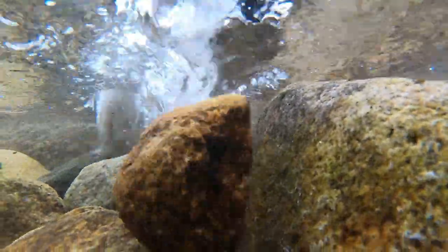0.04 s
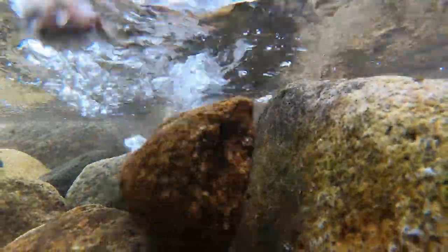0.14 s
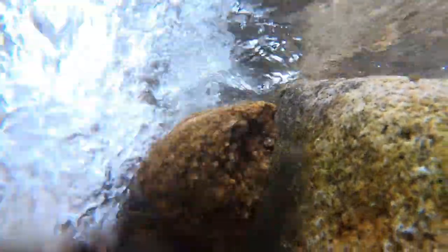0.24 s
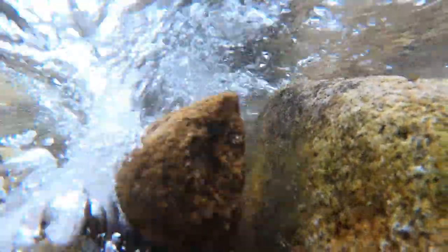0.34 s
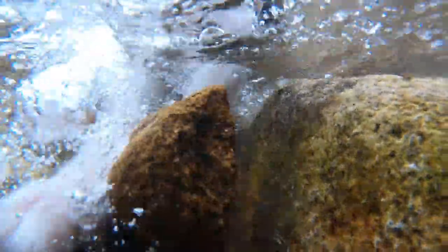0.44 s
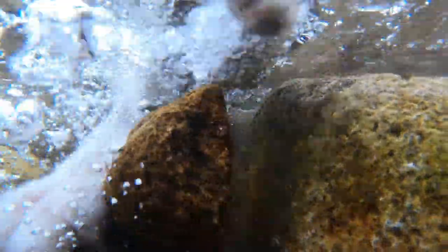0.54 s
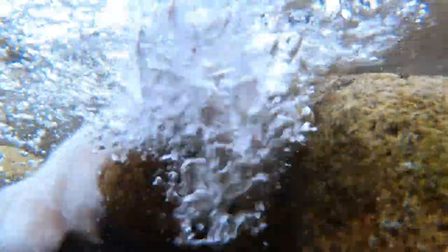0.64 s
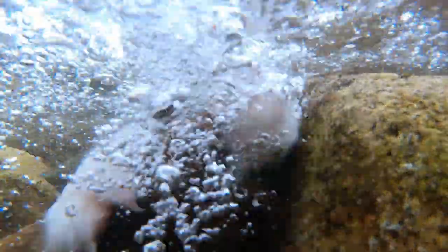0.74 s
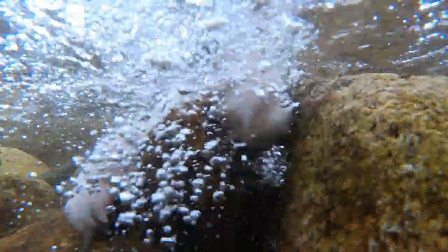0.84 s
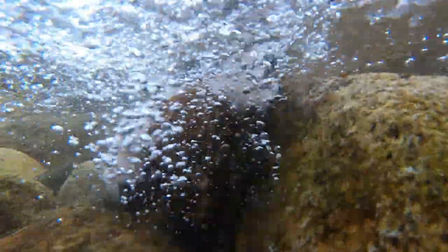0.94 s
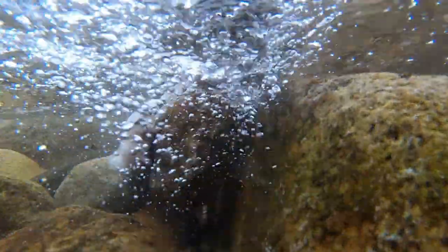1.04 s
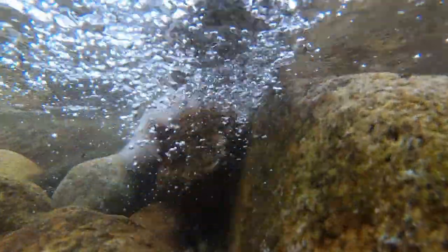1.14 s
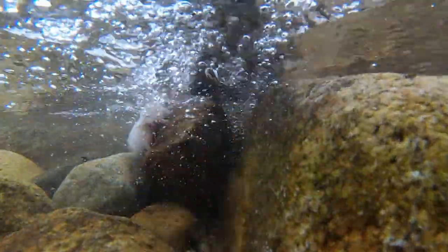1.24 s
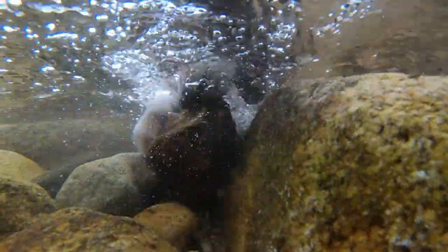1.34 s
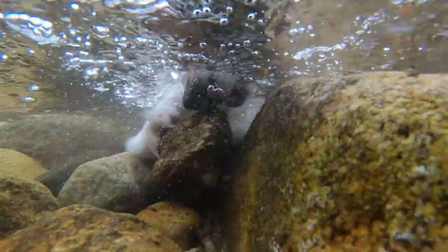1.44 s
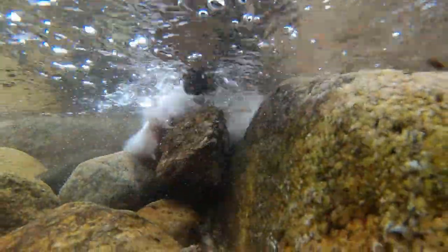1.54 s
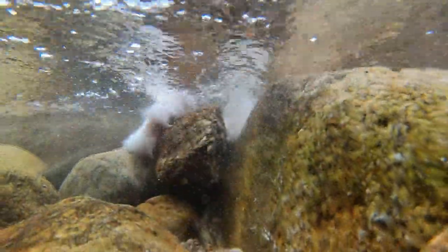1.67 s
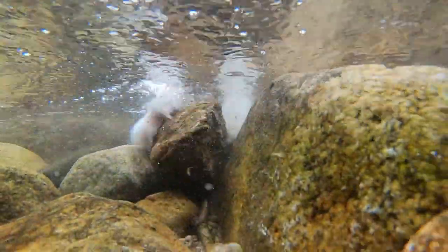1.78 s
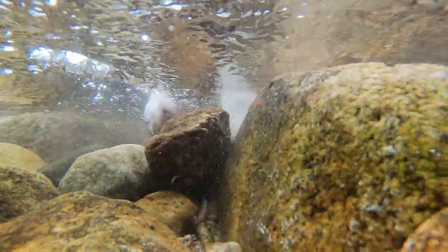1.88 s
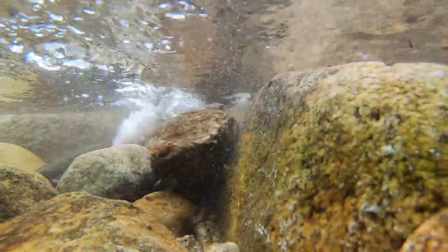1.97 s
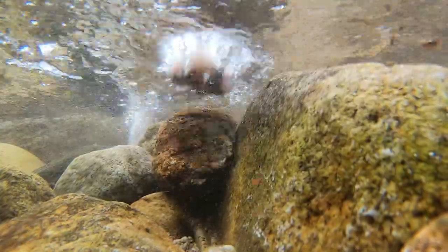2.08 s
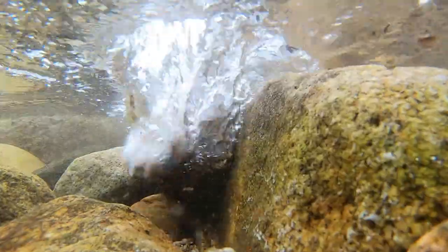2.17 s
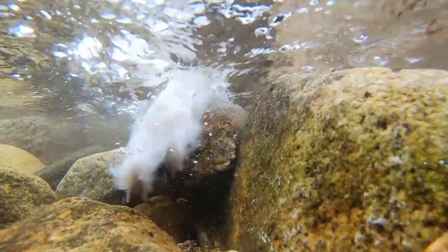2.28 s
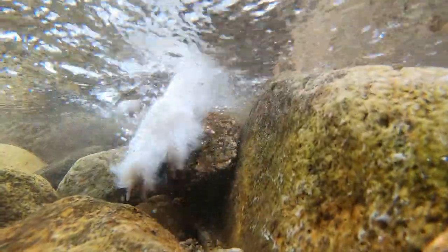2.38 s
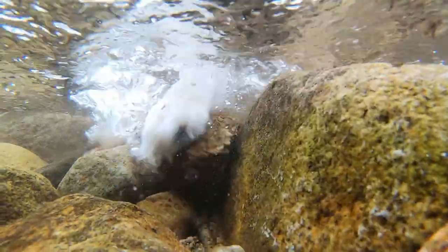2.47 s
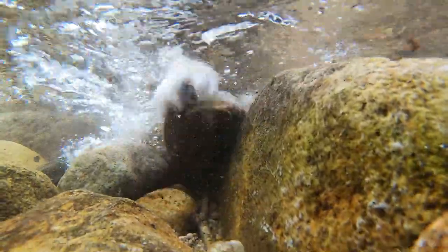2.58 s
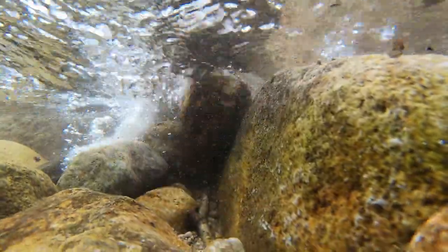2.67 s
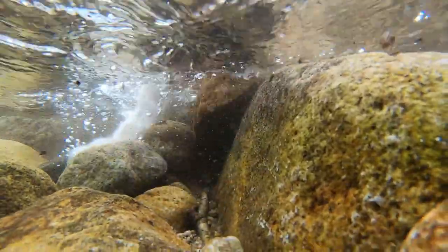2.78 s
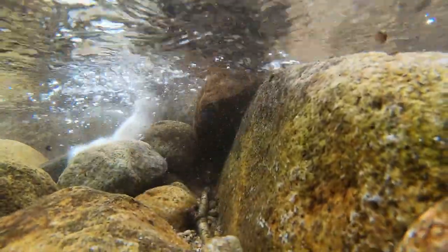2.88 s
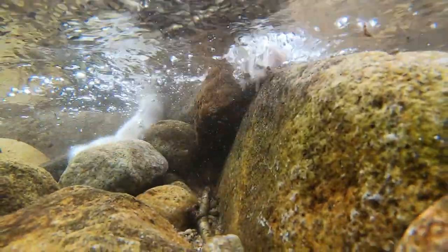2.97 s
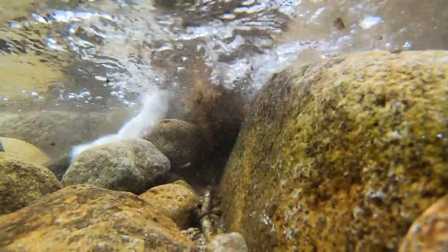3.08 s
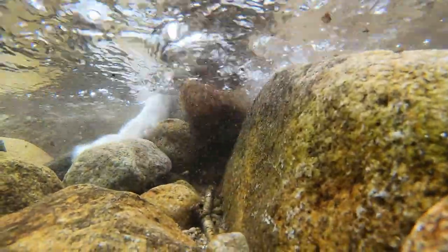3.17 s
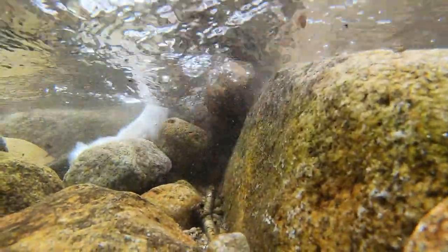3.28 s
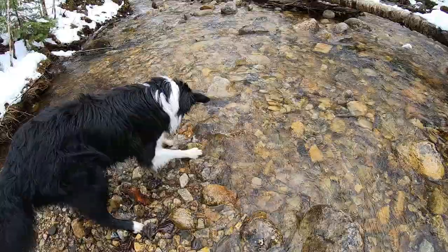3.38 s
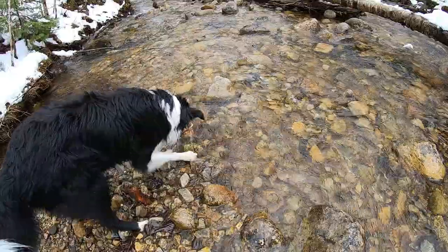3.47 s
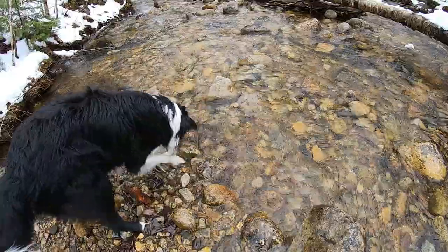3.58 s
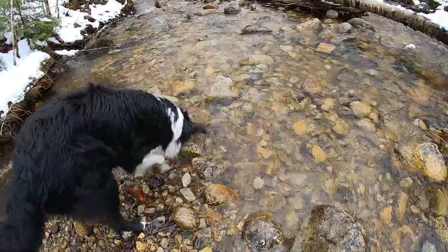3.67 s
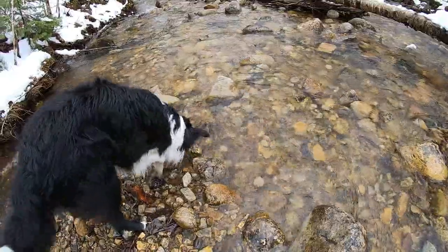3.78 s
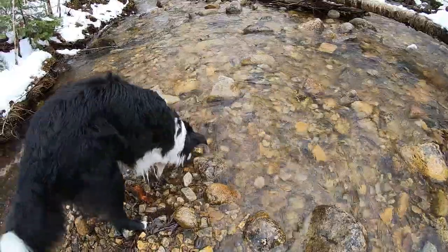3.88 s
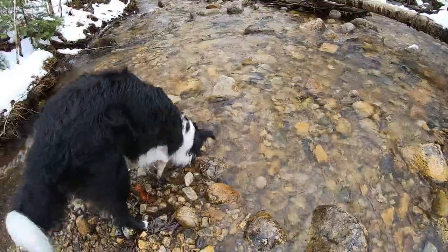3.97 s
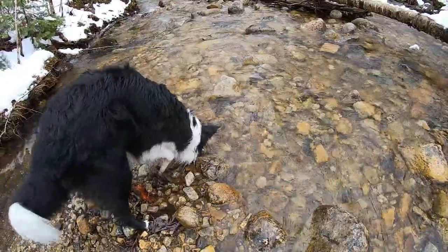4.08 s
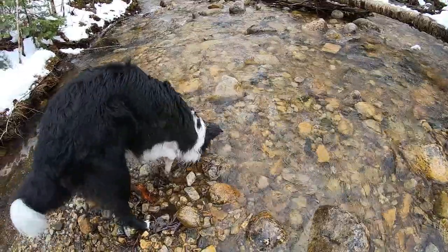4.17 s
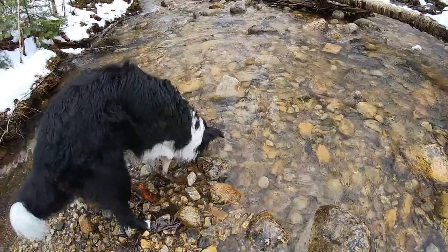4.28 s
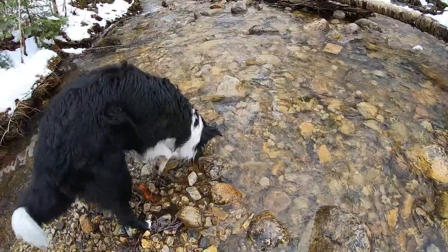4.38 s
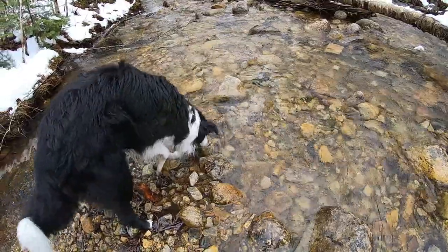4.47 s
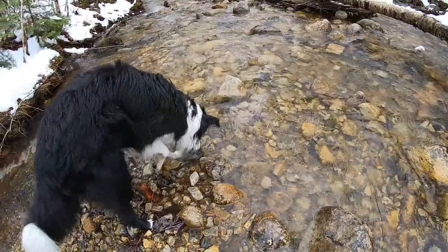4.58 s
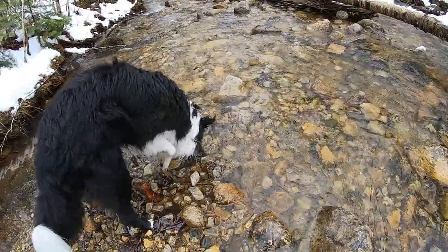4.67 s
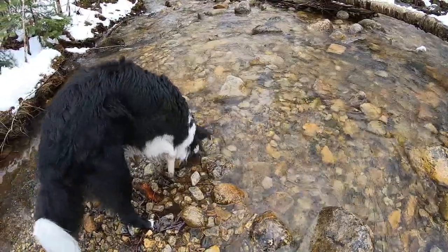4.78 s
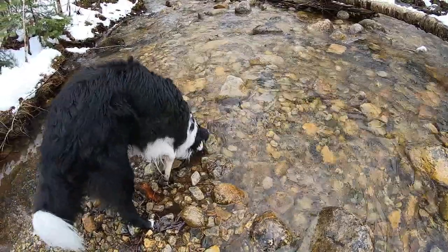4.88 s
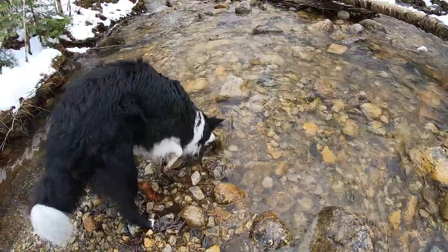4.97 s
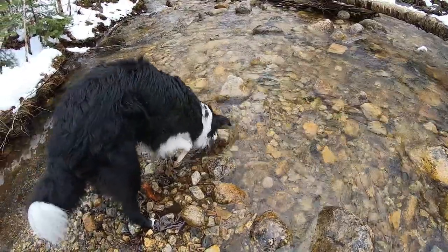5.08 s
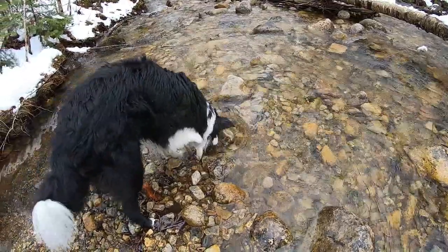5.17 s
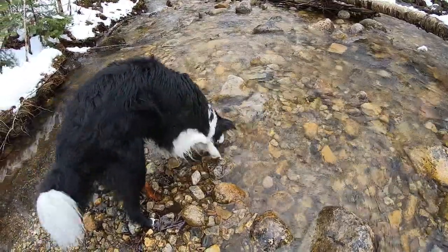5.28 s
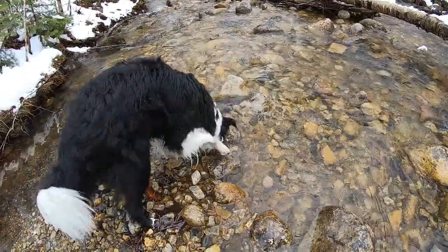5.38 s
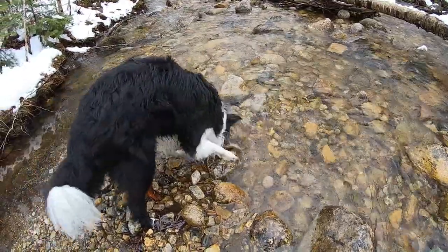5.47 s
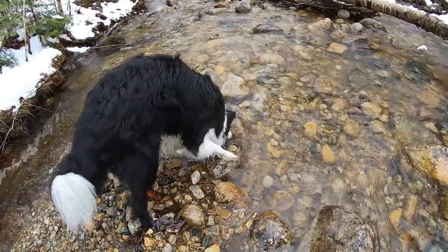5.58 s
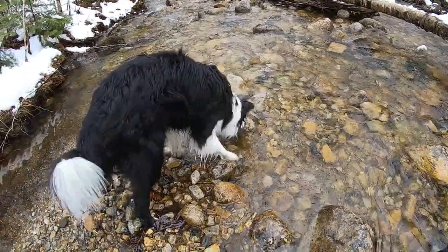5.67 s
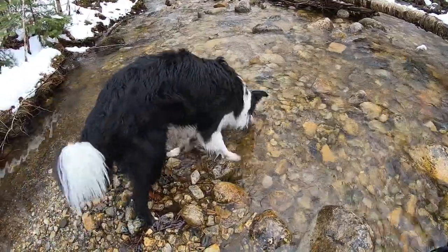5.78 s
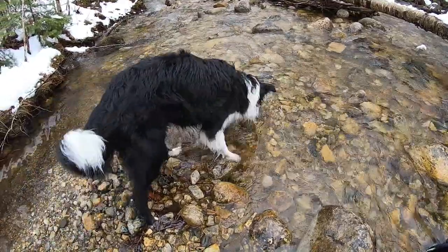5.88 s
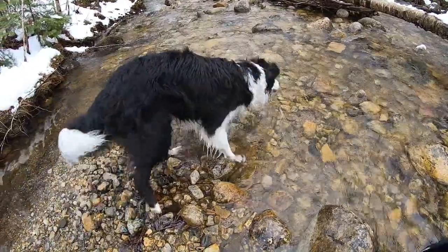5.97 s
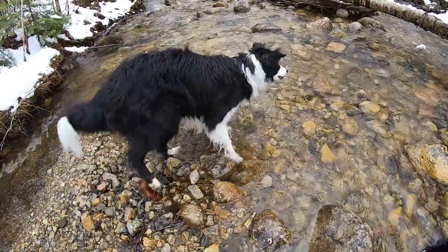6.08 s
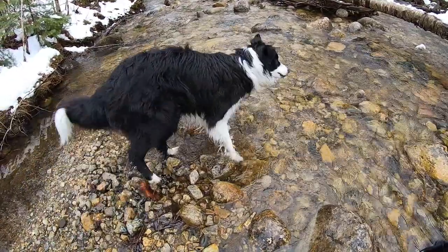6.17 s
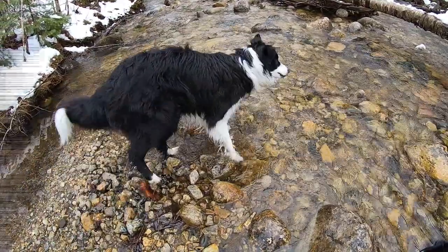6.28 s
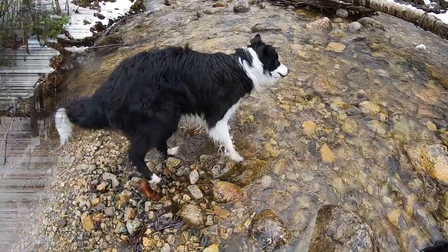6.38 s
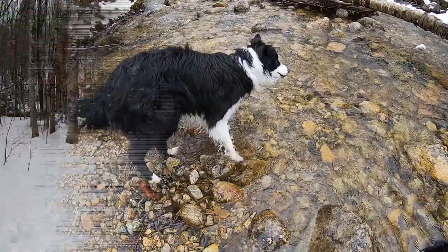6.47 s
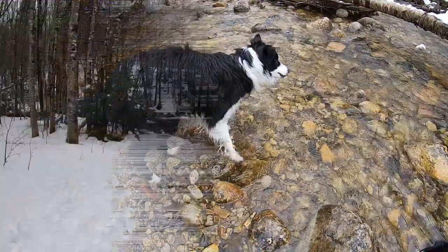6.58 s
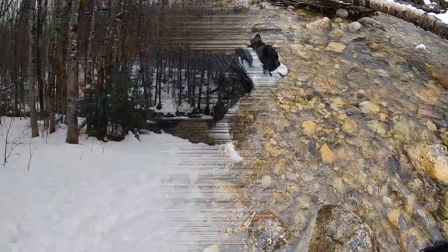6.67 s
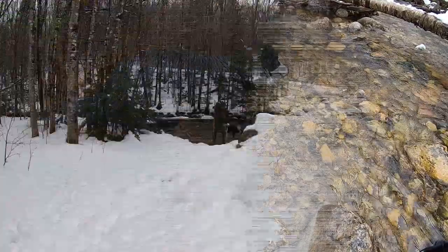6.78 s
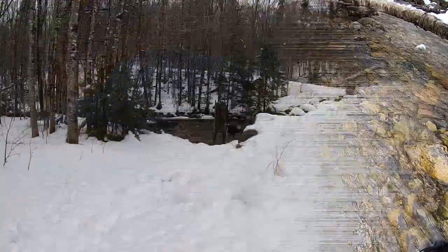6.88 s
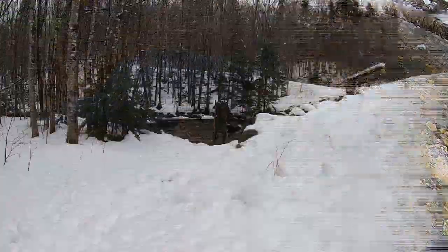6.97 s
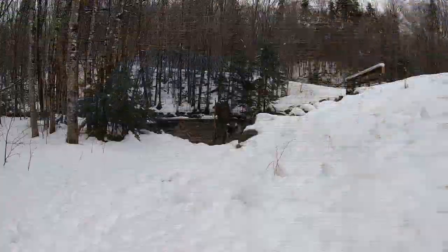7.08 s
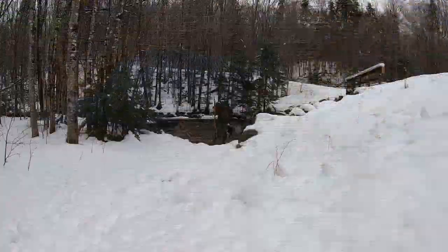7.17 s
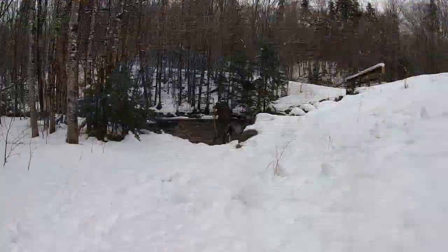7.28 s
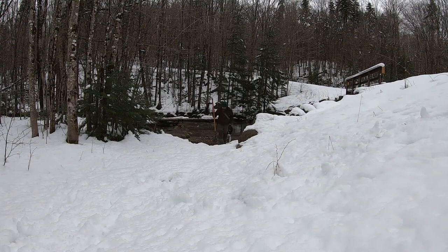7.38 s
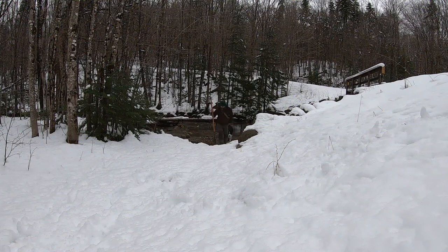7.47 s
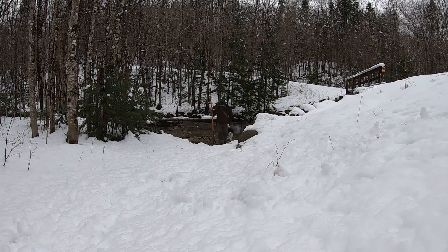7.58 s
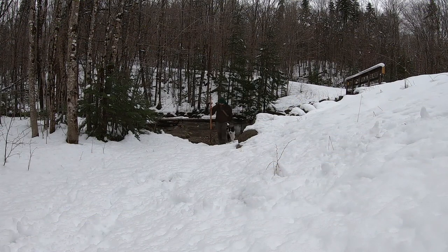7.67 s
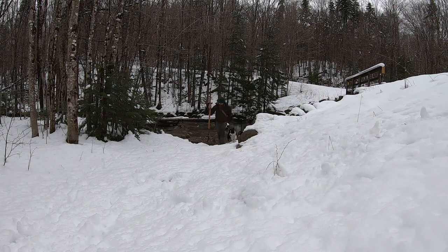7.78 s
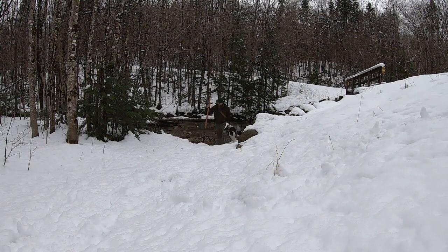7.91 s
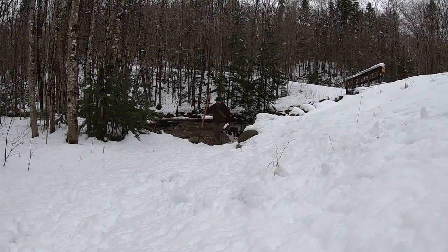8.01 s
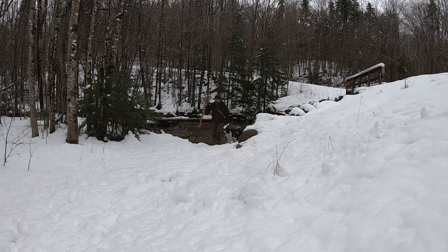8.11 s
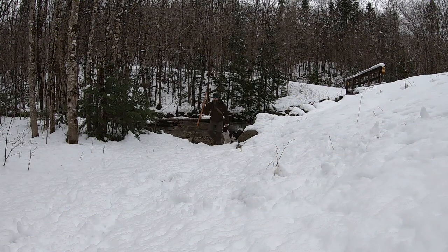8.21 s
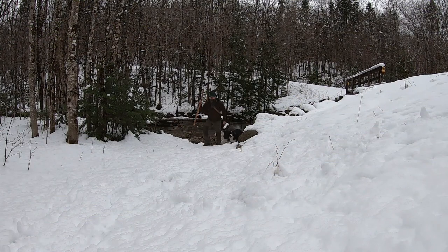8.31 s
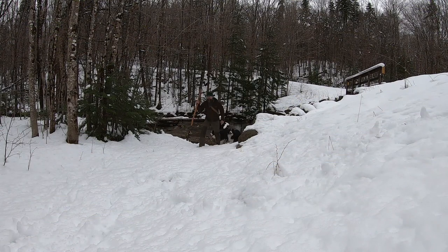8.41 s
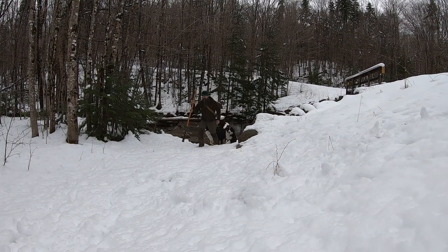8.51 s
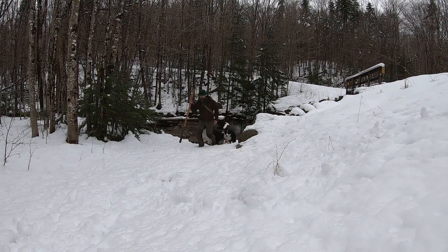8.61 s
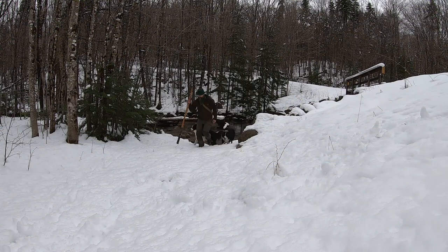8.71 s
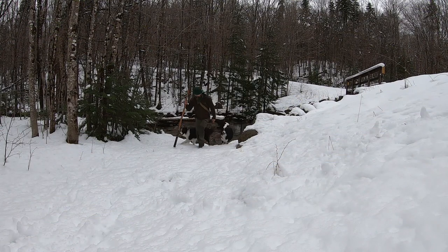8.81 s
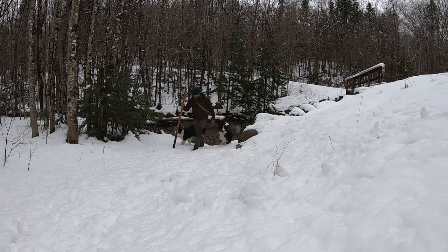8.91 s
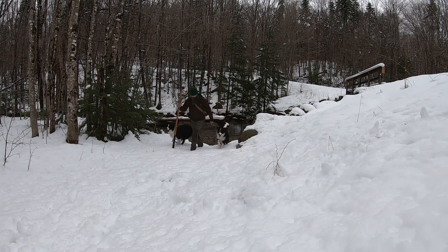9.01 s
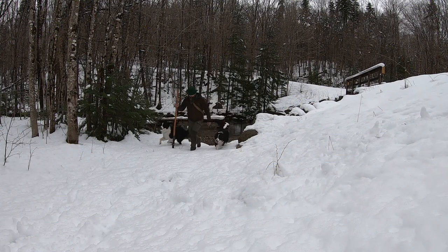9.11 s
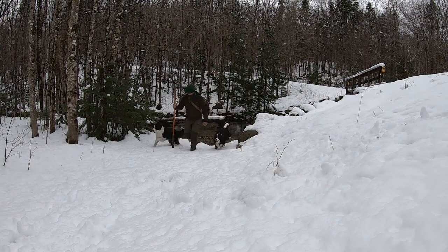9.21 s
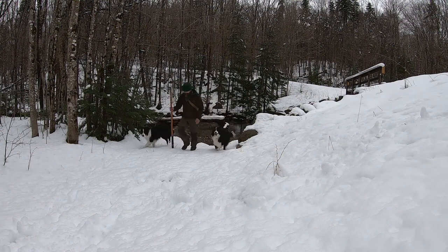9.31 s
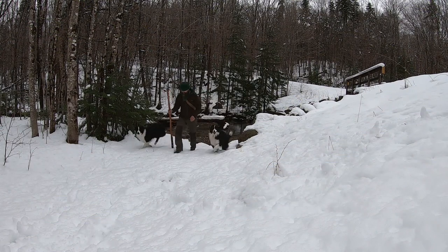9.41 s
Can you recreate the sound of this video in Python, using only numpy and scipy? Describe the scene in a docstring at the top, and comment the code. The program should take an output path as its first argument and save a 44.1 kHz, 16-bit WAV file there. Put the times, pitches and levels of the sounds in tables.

```python
"""A shallow rocky stream heard from three places in turn, parted by about 10 ms of silence.
Under water a dog paws at a stone: damped tones make thuds and bubbles, resonated clicks make bubble clouds and
grit, all nearly mono and mostly muffled. Just above the water, coloured noise and small resonators make
the babble, and paws splash and drip as short swells of noise and tone. Last, from afar across snow, partly coherent
noise makes a smooth, wide rush, with two short bright puffs."""
import sys
import numpy as np
from scipy import signal
from scipy.fft import rfft, irfft, next_fast_len
from scipy.io import wavfile
from scipy.ndimage import uniform_filter1d

SR = 44100
rng = np.random.default_rng(int(sys.argv[2]) if len(sys.argv) > 2 else 0)


def inscribe(sig):
    """Save sig as 16-bit PCM at rate SR to the path in sys.argv[1].

    A 1-D sig is mono; a 2-D sig holds one channel per row.
    Samples are clipped to [-1, 1] before scaling.
    """
    pcm = np.round(np.clip(np.atleast_2d(sig).T, -1, 1) * 32767)
    wavfile.write(sys.argv[1], SR, pcm.astype(np.int16))


N = 416744
TIME = np.arange(N) / SR
SIZE = next_fast_len(N)
HZ = np.maximum(np.fft.rfftfreq(SIZE, 1 / SR), 1)

# Strokes of the paws under water. Each row: start in seconds, length in seconds,
# churn level in dB, bubble cloud level in dB, both before the muffling.
STROKES = [(0.0, 0.18, -14, -25.5), (0.246, 0.27, -22, -25), (0.64, 0.091, -25, -24.5),
           (0.707, 0.2, -18, -25), (0.93, 0.098, -28.5, -23), (1.018, 0.19, -20, -32),
           (1.29, 0.093, -18, -31), (1.413, 0.11, -23.5, -37.5), (1.572, 0.054, -28, -46.5),
           (1.815, 0.18, -15.5, -35), (2.115, 0.22, -19, -30.5), (2.512, 0.32, -14.5, -33),
           (2.852, 0.11, -18.5, -30.5), (3, 0.15, -18, -30.5), (3.197, 0.17, -16, -32.5)]
STROKE_ATTACK_S, STROKE_RELEASE_S = 0.0087, 0.0037
# Spectrum of spray. Each row: frequency in Hz, relative level in dB per Hz.
SPRAY_SPECTRUM = [(250, -40), (500.0, -8), (1150.0, -3), (1400.0, -0.5), (1750, -10.5), (2300.0, -14),
                  (2950.0, -2.5), (4000.0, -11), (5100.0, -12), (5600.0, -31), (9500.0, -30.5),
                  (11000.0, -39), (15500.0, -52.5)]
SPLASH_ATTACK_S, SPLASH_RELEASE_S = 0.012, 0.012


def from_db(db):
    """Amplitude ratio: 20 dB is a factor of ten."""
    return 10 ** (np.asarray(db) / 20)


def rms_one(x):
    """Normalisation by mean power: scale to rms 1."""
    return x / np.sqrt(np.mean(x ** 2) + 1e-20)


def columns(rows, at, warp=np.asarray):
    """Linear interpolation of every later column along the first, whose axis may be warped."""
    first, *rest = np.transpose(rows)
    return [np.interp(warp(at), warp(first), column) for column in rest]


def colour(x, spectrum):
    """Linear filtering: a flat signal takes on the given spectrum, at rms 1."""
    gain_db = columns(spectrum, HZ, np.log)[0]
    filtered = irfft(rfft(x, SIZE) * from_db(gain_db), SIZE)
    return rms_one(filtered[:N])


def drift(rate_hz):
    """Low-pass random fluctuation: noise twice through a one-pole filter, at rms 1."""
    pole = np.exp(-2 * np.pi * rate_hz / SR)
    noise = rng.standard_normal(N + SR)
    settled = signal.lfilter([1], [1, -2 * pole, pole * pole], noise)[SR:]
    return rms_one(settled)


def narrow_band(width_hz, phase):
    """Quadrature modulation: two slow drifts on cosine and sine make noise around a centre pitch."""
    return drift(width_hz) * np.cos(phase) + drift(width_hz) * np.sin(phase)


def grains(per_s, spread_db, clump_db, clump_hz):
    """Random point process: clicks of uneven size and sign, their median rate per_s wandering in clumps."""
    size_db = spread_db * np.minimum(rng.exponential(1, N), 5)
    sizes = from_db(size_db) * rng.choice([-1, 1], N)
    rate = per_s * from_db(clump_db * drift(clump_hz))
    return sizes * (rng.random(N) < rate / SR)


def bubbles(clicks, low_hz, high_hz, cycles, count=28):
    """Damped resonance: clicks dealt to resonators spread in pitch, each falling 60 dB in so many cycles."""
    dealt, out = rng.integers(0, count, N), 0
    for k, hz in enumerate(np.geomspace(low_hz, high_hz, count)):
        radius = from_db(-60 * hz / (cycles * SR))
        angle = 2 * np.pi * hz / SR
        feedback = [1, -2 * radius * np.cos(angle), radius * radius]
        ring = signal.lfilter([0, np.sin(angle)], feedback, clicks * (dealt == k) + 1e-18)
        out = out + hz ** 0.91 * ring  # evens out the spectrum
    return rms_one(out)


def wavelets(rows, rise):
    """Transient oscillation: a tone under (t exp(1 - t))^2, its pitch gliding up by 2 * rise per nominal cycle."""
    out = np.zeros(N + SR)
    phases = rng.random((len(rows), 1))
    for (peak_s, peak_db, hz, cycles), phase in zip(rows, phases):
        cycles = max(cycles, .3)
        turns = np.arange(int(6 * cycles * SR / hz)) * hz / SR
        swell = (turns / cycles * np.exp(1 - turns / cycles)) ** 2
        tone = np.sin(2 * np.pi * (turns * (1 + rise * turns) + phase))
        start = max(round((peak_s - cycles / hz) * SR), 0)
        out[start:start + len(turns)] += from_db(peak_db) * swell * tone
    return out[:N]


def spells(starts, lengths, levels_db, attack_s, release_s, wake):
    """Incoherent addition: spells rise, hold, drop to a wake and fade, their powers adding to a calm level.

    The wake holds the calm level in dB, the wake re its spell in dB, and the fading in dB per s."""
    calm_db, wake_db, fade_db = wake
    time = TIME[::20]
    power = from_db(2 * calm_db)
    for start, length, db in zip(starts, lengths, levels_db):
        after = np.maximum(time - start - length, 0)
        drop_db = wake_db * np.minimum(after / release_s, 1) - fade_db * after
        attack = np.clip((time - start) / attack_s, 0, 1)
        power = power + (attack * from_db(db + drop_db)) ** 2
    return np.interp(TIME, time, np.sqrt(power))


def swells(times, levels_db, rise_s):
    """Critical damping: a double pole makes each click swell as t exp(-t) to the given height."""
    clicks, pole = np.zeros(N), np.exp(-1 / (rise_s * SR))
    clicks[np.round(times * SR).astype(int)] = from_db(levels_db)
    return signal.lfilter([0, np.e / (rise_s * SR)], [1, -2 * pole, pole * pole], clicks + 1e-18)


def channel_hiss():
    """Uncorrelated self-noise: each channel has a steady coloured hiss of its own."""
    # Spectrum of the hiss. Each row: frequency in Hz, relative level in dB per Hz.
    hiss_spectrum = [(30, 3.5), (150, -20.5), (2000, -24), (15500, -19.5)]
    level_db = -65.5
    return from_db(level_db) * np.array([colour(rng.standard_normal(N), hiss_spectrum) for _ in range(2)])


def water_churn():
    """Turbulent pressure fluctuation: narrow low noise swells with each stroke and lingers in its wake."""
    start_s, length_s, churn_db, _ = np.transpose(STROKES)
    gain = spells(start_s, length_s, churn_db, STROKE_ATTACK_S, STROKE_RELEASE_S, wake=(-45, -11.5, 45))
    centre_hz = 100
    return gain * rms_one(narrow_band(34.0, 2 * np.pi * centre_hz * TIME))


def paw_thuds():
    """Impulsive excitation: paws and stone send out low, short-lived pressure swings."""
    # Thuds before the muffling. Each row: envelope peak in seconds, peak level in dB,
    # starting pitch in Hz, cycles to the peak.
    thuds = [(0.072, 3, 120, 0.46), (0.105, -3.5, 118.3, 0.83), (0.161, -3.5, 181, 2.65),
             (0.192, -5, 147.7, 0.91), (0.263, -5, 145.6, 1.1), (0.339, -8, 110.3, 0.68),
             (0.383, -6, 183, 2.2), (0.407, -8.5, 156.7, 3.0), (0.427, 0.5, 150, 1.8),
             (0.688, -6, 101.2, 0.15), (0.742, -8.5, 245, 3.2), (0.775, -10.5, 211.6, 2.2),
             (0.808, -8.5, 230, 2.4), (0.841, -9, 253, 3.5), (0.868, -12, 259, 2.5), (1.05, -9, 140.6, 1.2),
             (1.111, -13, 178.4, 2.8), (1.35, -19, 100.0, 2), (1.448, -17, 238, 2), (1.655, -7, 126, 0.89),
             (1.837, -10, 153, 1.2), (1.866, -11.5, 110.4, 1.9), (1.904, -13.5, 95.3, 1.6),
             (1.953, -8, 115.7, 0.63), (2.028, -9.5, 128.6, 1.5), (2.092, -6.5, 120.6, 0.65),
             (2.129, -6, 144.7, 1.1), (2.149, -17, 125, 0.38), (2.199, -2.5, 152, 0.67),
             (2.224, -8.5, 119, 0.8), (2.545, -9.5, 167, 3.1), (2.595, -10, 100, 3), (2.66, -7.5, 100, 2.2),
             (2.734, -9.5, 98.1, 2), (2.769, -8.5, 123.3, 1.5), (2.795, -8.5, 256.4, 2.3),
             (2.985, -13, 98.2, 3.5), (3.087, -4.5, 115, 0.97), (3.159, -6, 133, 1.2),
             (3.203, -5.5, 129.2, 0.4), (3.247, -4, 94.4, 0.87), (3.319, -4.5, 134, 0.85)]
    return wavelets(thuds, rise=0.0081)


def large_bubbles():
    """Volume pulsation of a gas bubble: each glug is one damped tone of slightly rising pitch."""
    # Single glugs before the muffling. Each row: envelope peak in seconds, peak level in dB,
    # starting pitch in Hz, cycles to the peak.
    glugs = [(0.157, -12, 500, 0.85), (0.26, -19, 558, 1.8), (0.365, -18.5, 884, 4.1),
             (0.543, -17.5, 532, 3.1), (0.652, -14, 538, 0.82), (0.771, -6.5, 398, 2),
             (0.825, -16, 470, 6.1), (0.855, -17, 515, 7.1), (1.05, -16.5, 499, 8), (0.968, -15, 511, 7),
             (1.089, -9.5, 479, 4.0), (1.14, -10, 515, 3.58), (1.164, -10.5, 493, 4.4), (1.2, -16, 519, 11),
             (1.115, -16, 502, 5.1), (1.285, -20, 800, 3.6), (1.337, -17, 860, 2.5), (1.415, -32, 782, 12),
             (1.355, -21, 506, 5.1), (1.532, -21.5, 502, 1.5), (1.648, -23, 606, 0.59),
             (1.845, -27, 537, 4.1), (1.885, -25.5, 505, 4.1), (2.122, -15.5, 618, 0.88),
             (2.255, -20, 814, 3.6), (2.271, -10.5, 492, 2.36), (2.572, -8.5, 532, 1.6),
             (2.699, -20.5, 719, 3.6), (2.79, -15, 474, 2.2), (3.025, -25, 556, 4.1),
             (3.225, -27, 520, 1.62)]
    return wavelets(glugs, rise=0.0014)


def bubble_cloud(shake):
    """Superposed bubble resonances: clumped pops ring and knock on the housing, stronger at every blow."""
    # Spectrum before the muffling. Each row: frequency in Hz, relative level in dB per Hz.
    cloud_spectrum = [(120, -4.5), (260, 1), (320, -10.5), (372, -3), (420, -17.5), (460, -7.5), (535, 0),
                      (610, -13.5), (1000, -21), (1250, -42), (1500, -63)]
    start_s, length_s, _, cloud_db = np.transpose(STROKES)
    gain = spells(start_s, length_s, cloud_db, STROKE_ATTACK_S, STROKE_RELEASE_S, wake=(-42, -3, 56))
    pops = grains(600, 3.2, 4, 14)
    knocks = 0.5 * rms_one(pops)
    cloud = colour(bubbles(pops, 201, 1500, cycles=42.3) + knocks, cloud_spectrum)
    return gain * cloud * (1 + 0.38 * shake)


def stone_scrapes(shake):
    """Frictional micro-impacts: claws and sand click on stone as bright grit, beside a fizz of fine bubbles."""
    # Scrapes. Each row: start in seconds, length in seconds, grit level in dB before the shaking,
    # fizz level in dB.
    scrapes = [(0.0, 0.12, -47, -39.5), (0.176, 0.036, -52, -64.5), (0.261, 0.17, -58, -50),
               (0.638, 0.13, -59.5, -48.5), (1.094, 0.12, -63.5, -69), (1.301, 0.14, -61.5, -61),
               (1.49, 0.012, -61, -72), (1.553, 0.014, -58, -64.5), (1.633, 0.017, -63.5, -64),
               (1.811, 0.17, -66, -65), (1.985, 0.03, -53, -55.5), (2.105, 0.18, -58, -52),
               (2.511, 0.064, -53, -47), (2.6, 0.23, -56, -55.5), (2.992, 0.048, -54.5, -50),
               (3.059, 0.086, -50, -67), (3.179, 0.23, -60.5, -65)]
    # Spectra of grit and fine bubbles. Each row: frequency in Hz, relative level in dB per Hz.
    grit_spectrum = [(1000, -30.5), (1500.0, -12), (2100.0, -9.5), (2770.0, 2.5), (3350.0, -10),
                     (3950, -17.5), (4400.0, -13.5), (5100.0, -26.5), (9000.0, -35.5), (15000.0, -35.5)]
    fizz_spectrum = [(700, -24), (1100, 8), (1600, -4), (2300, -10.5), (3500, -18.5), (15000, -42.5)]
    start_s, length_s, *levels_db = np.transpose(scrapes)
    gritting, fizzing = [spells(start_s, length_s, db, attack_s=0.015, release_s=0.015, wake=(-73.5, -14, 82))
                         for db in levels_db]
    sand = grains(3500, 2.5, 4, 25)
    grit = colour(bubbles(sand, 1400, 9000, cycles=32.0, count=16), grit_spectrum) * (1 + 0.25 * shake)
    fine = grains(900, 2.5, 5.2, 40)
    fizz = colour(bubbles(fine, 900, 2600, cycles=25.0, count=14), fizz_spectrum)
    return gritting * grit + fizzing * fizz


def under_water():
    """Low-pass transmission: the housing muffles churn, thuds and bubbles; scrapes pass it unmuffled."""
    thuds, glugs = paw_thuds(), large_bubbles()
    # every blow shakes loose a burst of bubbles and grit
    shake = rms_one(uniform_filter1d(np.abs(thuds) + 0.27 * np.abs(glugs), size=700))
    swell = water_churn() + thuds
    # the membrane yields more one way than the other: crests sharpen, slow heaves appear
    heave = signal.sosfilt(signal.butter(2, 32, "high", fs=SR, output="sos"), swell ** 2)
    water = swell + 0.46 * heave + glugs + bubble_cloud(shake)
    muffled = signal.sosfilt(signal.butter(4, 1150, fs=SR, output="sos"), water)
    return muffled + stone_scrapes(shake)


def babble():
    """Superposition of many small bubble resonances on smooth noise, under one broad spectrum."""
    # Spectrum of the babble. Each row: frequency in Hz, relative level in dB per Hz.
    babble_spectrum = [(100, -36), (160, -8.5), (330, -4), (1100, -6.5), (2300, -12), (5100, -23),
                       (5500, -30.5), (8500, -32.5), (10800, -39), (12000, -45), (15500, -63)]
    level_db = -35
    small = bubbles(grains(1100, 2.6, 3, 6.7), 150, 1000, cycles=26.0, count=18)
    return from_db(level_db) * colour(0.3 * small + rng.standard_normal(N), babble_spectrum)


def sinking_band():
    """Modulated carrier: a narrow band of hiss sinks steadily in pitch, holds its level, then fades."""
    start_s, length_s, level_db = 3.35, 0.8, -46
    start_hz, sinks_hz_per_s, width_hz = 3150, 420, 140
    centre_hz = start_hz - sinks_hz_per_s * (TIME - start_s)
    band = narrow_band(width_hz, 2 * np.pi * np.cumsum(centre_hz) / SR)
    return band * spells([start_s], [length_s], [level_db], SPLASH_ATTACK_S, SPLASH_RELEASE_S, wake=(-90, -5, 25))


def paw_spray():
    """Amplitude-modulated noise: fine bubbles and hiss flutter in level through each spell of splashing."""
    # Splashing at the surface. Each row: start in seconds, length in seconds, spray level in dB before the flutter.
    splashes = [(3.353, 0.34, -34), (3.7, 0.13, -31), (5.727, 0.39, -45.5)]
    gain = spells(*np.transpose(splashes), SPLASH_ATTACK_S, SPLASH_RELEASE_S, wake=(-48, -10, 34))
    fizz = bubbles(grains(1500, 4.0, 4, 25), 850, 4580, cycles=40.0)
    spray = colour(fizz + 1.4 * rng.standard_normal(N), SPRAY_SPECTRUM)
    flutter = from_db(2.4 * drift(13.4))
    return gain * spray * flutter


def slaps_and_drips():
    """Impact on a free surface: slaps are swells of spray and treble; drips tick and ring for a few cycles."""
    # Slaps on the water. Each row: onset in seconds, spray level in dB, treble level in dB.
    slaps = [(3.378, -25, -65), (3.459, -54, -47), (3.511, -37, -40.5), (3.5303, -27.5, -47),
             (3.596, -22.5, -47), (3.684, -41, -55), (3.726, -25.5, -50), (3.775, -29, -60),
             (5.021, -33, -45.5), (5.167, -36, -54), (5.497, -37, -41), (5.776, -38, -45.5),
             (5.815, -46, -47), (5.98, -54, -44.5), (6.0025, -40, -49)]
    # Single drips. Each row: ring's envelope peak in seconds, peak level in dB, starting pitch in Hz.
    drips = [(3.388, -17, 1450), (3.517, -26, 4830), (3.534, -20.5, 2840), (3.615, -15, 3820),
             (3.728, -21, 3800), (3.781, -11, 3500), (3.783, -17, 1120), (3.831, -24, 1360),
             (4.011, -25, 560), (5.098, -32, 1690), (5.023, -31, 850), (5.04, -28.5, 1510),
             (5.174, -21.5, 784), (5.194, -25.5, 3000), (5.386, -24.5, 770), (5.7, -31, 1500),
             (5.734, -30, 4600), (5.748, -36, 4800), (5.82, -28, 2500), (5.855, -29, 1500),
             (6.004, -26, 1980), (6.039, -30, 3000)]
    # Treble of a slap. Each row: frequency in Hz, relative level in dB per Hz.
    treble_spectrum = [(4000, -14.5), (6000, -2.5), (10000, -4.5), (15500, -28)]
    slap_rise_s, treble_rise_s = 0.0056, 0.0071
    tick_rise_s, tick_db = 0.001, -9  # the broad tick of a landing drip, level re its ring
    # a ring peaks after 0.52 cycles plus 1.2 ms
    rings = wavelets([(s, db, hz, 0.52 + 0.0012 * hz) for s, db, hz in drips], rise=0.0011)
    slap_s, spray_db, treble_db = np.transpose(slaps)
    drip_s, drip_db, _ = np.transpose(drips)
    slapping = swells(slap_s, spray_db, slap_rise_s)
    ticking = swells(drip_s - tick_rise_s, drip_db + tick_db, tick_rise_s)
    spray = (slapping + ticking) * colour(rng.standard_normal(N), SPRAY_SPECTRUM)
    treble = colour(grains(4000, 5.2, 0.57, 330), treble_spectrum)
    return rings + spray + swells(slap_s, treble_db, treble_rise_s) * treble


def surface():
    """Linear superposition in air: babble, sinking hiss, spray and single drops simply add."""
    return babble() + sinking_band() + paw_spray() + slaps_and_drips()


def far_rush():
    """Partial coherence: countless far bubbles merge to noise that two capsules hear partly alike."""
    # Spectrum before the capsule balance. Each row: frequency in Hz, relative level in dB per Hz.
    rush_spectrum = [(110, -20.5), (250, -13), (470, -2.5), (1200, 2), (3100, -3.5), (4200, -10.5),
                     (7800, -15), (8600, -21.5), (10500, -29), (12500, -40.5), (15500, -62)]
    # Coherence of the capsules. Each row: frequency in Hz, likeness from 0 to 1.
    likeness = [(60, .05), (120, 0.26), (260, 0.82), (450, 0.82), (1100, 0.53), (2260, 0.4), (3900, 0.88),
                (5500, 0.029)]
    # Level difference. Each row: frequency in Hz, left over right in dB.
    balance = [(120, 0.5), (260, -0.5), (530, 2.5), (1100, 7), (2260, 3.5), (4680, 0)]
    # Phase difference of the shared part. Each row: frequency in Hz, left lead in radians.
    phase_lead = [(60, 0.93), (780, -0.34), (1380, -1.6), (2330, 0.31), (4820, 0.47)]
    level_db, sway_db = -40, 0.4
    (alike,), (over_db,), (lead,) = [columns(table, HZ, np.log) for table in (likeness, balance, phase_lead)]
    alike = np.clip(alike, 0, 1)
    ripples = bubbles(grains(2500, 3.0, 3.1, 9.3), 255, 9300, cycles=6.7)
    shared = rfft(colour(rng.standard_normal(N) + 0.16 * ripples, rush_spectrum), SIZE)
    own = rfft(colour(rng.standard_normal(N), rush_spectrum), SIZE)
    # likeness and its complement keep the right channel's power
    right = alike * np.exp(-1j * lead) * shared + np.sqrt(1 - alike ** 2) * own
    pair = irfft([shared * from_db(over_db / 2), right * from_db(-over_db / 2)], SIZE)[:, :N]
    return from_db(level_db + sway_db * drift(11.0)) * pair


def puffs():
    """Windowed noise: short bright puffs, like steps in snow, are grainy noise under half-sine swells."""
    # Puffs. Each row: start in seconds, length in seconds, crest level of the swell in dB.
    steps = [(6.182, 0.082, -39), (6.936, 0.071, -39.5)]
    # Spectrum of a puff. Each row: frequency in Hz, relative level in dB per Hz.
    puff_spectrum = [(800, -24), (1500.0, -11), (3000.0, 3.5), (4500.0, -4), (6800.0, -5.5), (9000.0, -20),
                     (15500.0, -44)]
    swell = 0
    for start, length, db in steps:
        swell = swell + from_db(db) * np.sin(np.pi * np.clip((TIME - start) / length, 0, 1))
    common = colour(grains(8000, 4.1, 4.8, 60), puff_spectrum)
    own = np.array([colour(rng.standard_normal(N), puff_spectrum) for _ in range(2)])
    return swell * (common + 0.28 * own)


def scene():
    """Time gating: the three places sound one after another, cut hard."""
    # Listening places in order. Each row: start in seconds, end in seconds.
    places = [(0, 3.336), (3.3455, 6.138), (6.1475, 9.46)]
    below, above, afar = [(TIME >= start) & (TIME < end) for start, end in places]
    hiss = channel_hiss()
    sealed_hiss = from_db(-23) * hiss  # the hiss is lower inside the sealed housing
    return below * (under_water() + sealed_hiss) + above * (surface() + hiss) + afar * (far_rush() + puffs())


def record(dry):
    """Saturation and band limiting: peaks are rounded, then the top is cut."""
    cutoff_hz = 15900
    rounded = .97 * np.tanh(dry / .97)
    return signal.sosfilt(signal.cheby2(12, 70, cutoff_hz, fs=SR, output="sos"), rounded)


dry = scene()
out = record(dry)
inscribe(out)
```